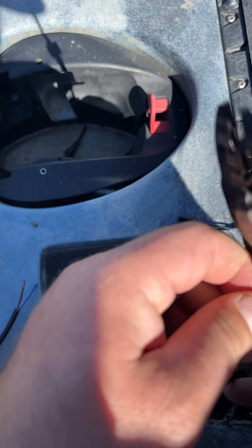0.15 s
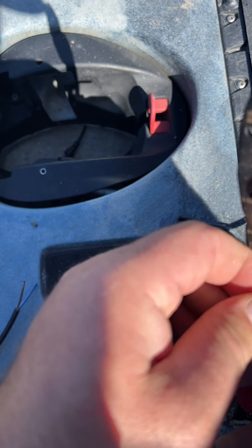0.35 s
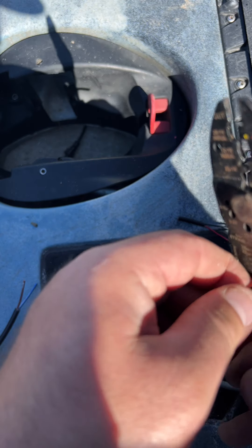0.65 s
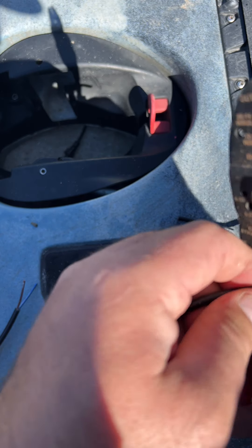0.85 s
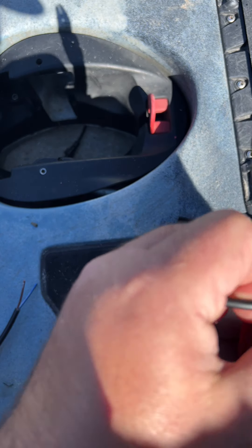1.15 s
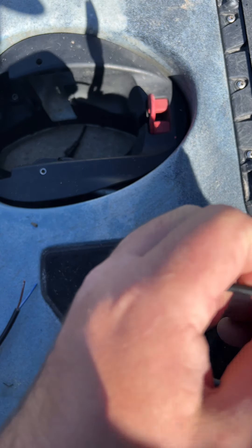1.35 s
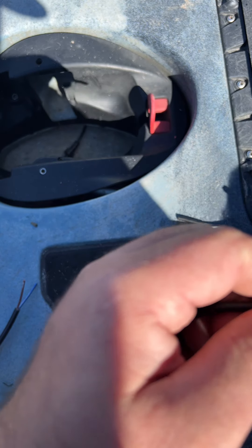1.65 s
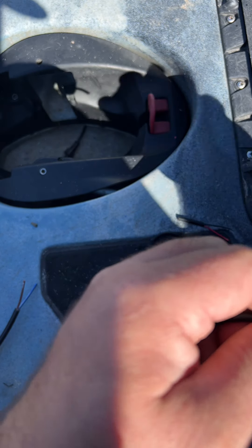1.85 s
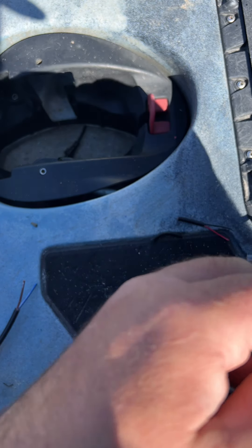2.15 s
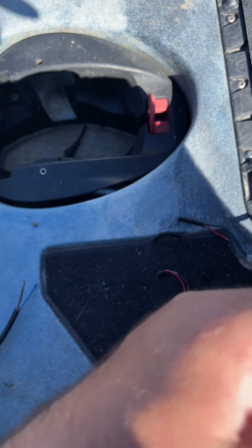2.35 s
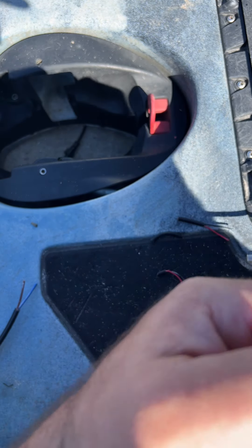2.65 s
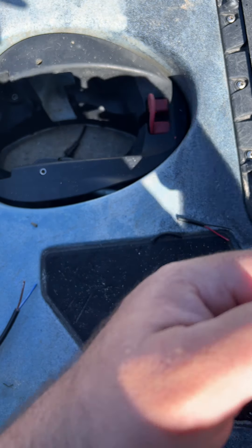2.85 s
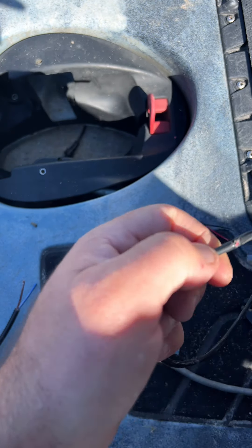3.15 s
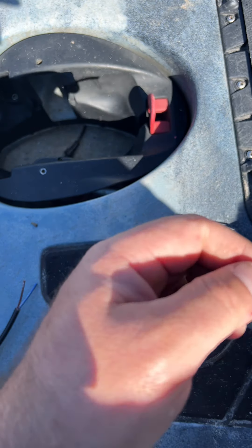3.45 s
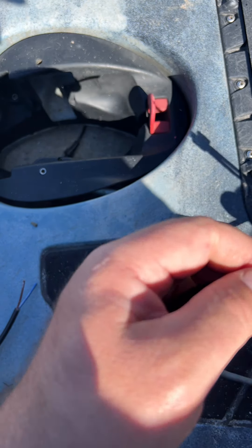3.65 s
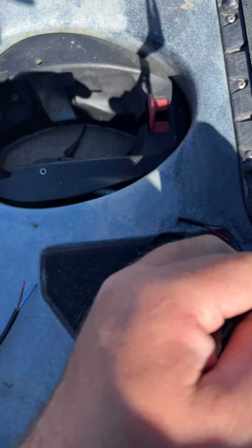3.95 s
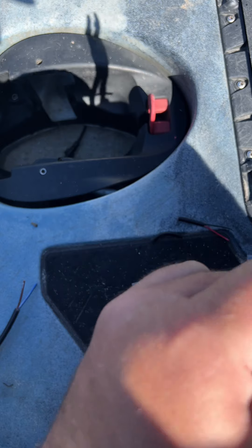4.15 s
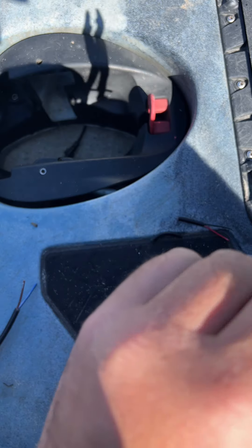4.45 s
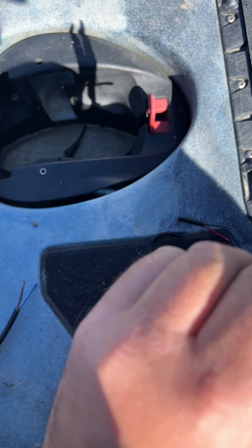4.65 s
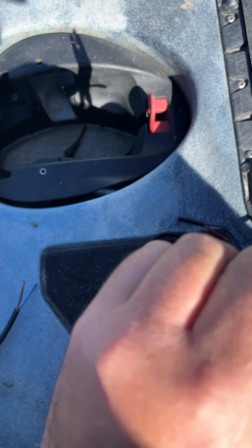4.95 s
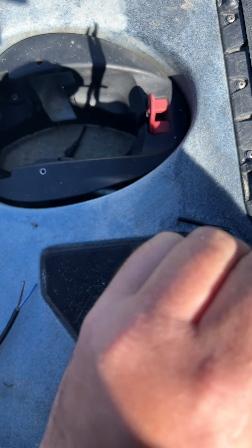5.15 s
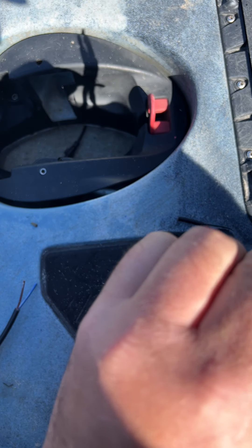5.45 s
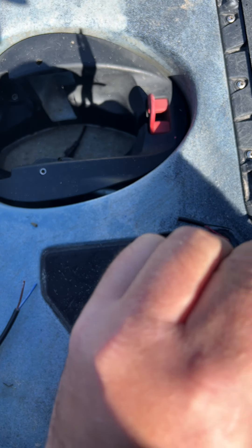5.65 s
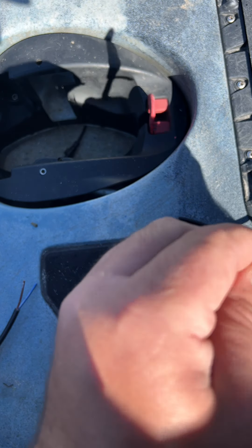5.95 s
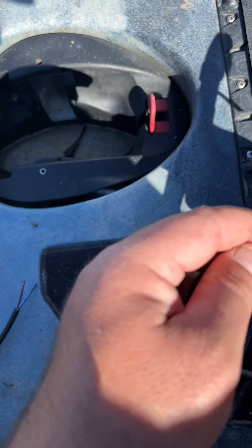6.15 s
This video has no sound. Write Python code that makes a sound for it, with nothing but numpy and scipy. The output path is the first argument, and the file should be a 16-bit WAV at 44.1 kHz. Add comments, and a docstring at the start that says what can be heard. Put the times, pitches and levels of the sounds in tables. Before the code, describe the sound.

Hands fidget with cutters and wire over a booming metal surface while distant traffic rumbles and an approaching vehicle grows, ending around a loud snip.

```python
"""Outdoors, far traffic (banded noise) and a nearing vehicle (boom, overtones, rumble, roar) sound throughout.
Hands work wire cutters close to a phone: wire rubs as uneven noise, and steel ticks as resonant bursts.
Small birds peep as gliding tones near 0.1 s and 1.3 s; loose cable knocks a hollow metal deck at 0.2 s, then
tumbles on it near 1.9 s and 3.5 s, as decaying modes with noisy rattles. The loudest snip comes near 5.75 s,
as the tyre roar still grows."""
import sys
import numpy as np
from scipy import signal
from scipy.fft import rfft, irfft, next_fast_len
from scipy.io import wavfile
from scipy.ndimage import uniform_filter1d

SR = 44100
rng = np.random.default_rng(int(sys.argv[2]) if len(sys.argv) > 2 else 0)


def file_out(sig):
    """Save sig as 16-bit WAV at sys.argv[1]."""
    # one column per channel
    cols = np.atleast_2d(sig).T
    # limit, then scale
    lim = np.clip(cols, -1, 1)
    pcm = np.round(lim * 32767).astype(np.int16)
    wavfile.write(sys.argv[1], SR, pcm)


N = 278334

# In band tables, width_hz is that of one pass (bands() makes two) and level_db is relative within the table.
# Far traffic spectrum before scaling: centre_hz, level_db (relative)
TRAFFIC_SPECTRUM = [(25, -27), (59, -4), (80, 1), (108, -11.5), (166, -1.5), (215, -22.5), (270, -39),
                    (450, -45), (1260, -45), (3000, -54.5), (4000, -45.5), (5200, -57.5), (8300, -62),
                    (10500, -72.5), (16000, -91)]
# Stereo breadth of the traffic: centre_hz, side_over_mid (ratio)
TRAFFIC_BREADTH = [(30, 1.2), (100, .12), (300, .3), (600, .7), (1200, .4), (5000, 0.49), (14000, .9)]
# Vehicle course: start_s, firing_rate_hz, boom_db, growl_db
VEHICLE_COURSE = [(0, 78, -47, -58), (1.1, 77, -48, -56), (1.7, 80, -46, -55), (2.2, 79.3, -48, -48),
                  (2.33, 79.5, -36, -49), (2.6, 79.4, -43, -48), (2.7, 79.5, -38, -50),
                  (2.95, 80, -39, -51), (3.25, 78, -48, -46), (3.85, 80.5, -38, -47),
                  (4.22, 79.6, -36, -44), (4.27, 79.3, -45, -45), (4.38, 79.5, -36, -45),
                  (4.47, 81.4, -52, -43), (4.66, 81.5, -29, -42), (4.95, 83.2, -27, -42),
                  (5.32, 85.3, -18, -39), (5.46, 85.8, -24, -39), (5.6, 86.7, -16, -38),
                  (5.78, 88.3, -20, -38), (5.87, 88.2, -28, -34), (6.06, 88.6, -29, -37),
                  (6.31, 88, -37, -38)]
# Exhaust overtones: multiple_of_firing_rate, level_db (relative to the growl)
EXHAUST_OVERTONES = [(1.5, -9), (2, 0.5), (2.5, -15), (3, -13.5), (4, -24)]
# Body rumble: centre_hz, width_hz, level_db
BODY_RUMBLE = [(60, 26, 2), (111.1, 62, -1), (184, 73, -4)]
# Tyre noise colour: centre_hz, width_hz, level_db
TYRE_BANDS = [(290, 73, 5.5), (420, 370, -1), (665, 870, 19.5), (1050, 1300, 0), (1917.5, 2200, 3),
              (3797, 2500, -24)]
# Tyre roar course: time_s, level_db
TYRE_COURSE = [(0, -81.5), (1.7, -71), (2.2, -65), (2.9, -66.5), (3.9, -67.5), (4.5, -65), (5, -60.5),
               (5.5, -59.5), (5.9, -56), (6.31, -54.5)]
# Whine tones: pitch_hz, level_db (before the swell)
WHINE_TONES = [(9518, -83), (9685, -83)]
# Rise and fall of the whine: time_s, gain_db
WHINE_COURSE = [(4.5, -30), (4.8, -13), (5.2, -4), (5.72, -2), (5.85, -30)]
# Wire sliding through fingers and jaws: start_s, rise_s, hold_s, fade_s, hiss_db, scrape_db, strand_db
WIRE_RUBS = [(1.118, .015, .045, .045, -57, -51, -64), (1.435, .04, .1, .07, -64, -73, -68),
             (2.115, .015, .02, .08, -70, -85, -90), (2.605, .008, .01, .06, -67, -65, -70),
             (2.81, .014, .06, .05, -60, -68, -64), (2.9, .07, .08, .2, -56, -66, -65),
             (3.44, .025, .06, .03, -68, -72, -80), (3.78, .015, .2, .05, -69, -75, -75),
             (3.98, .06, .15, .04, -73, -80, -80), (4.3, .02, .015, .015, -71, -85, -95),
             (4.525, .015, .02, .02, -72, -85, -95), (5.712, .01, .008, .02, -53, -56, -70),
             (5.745, .003, .008, .04, -61, -57, -72), (6.06, .08, .03, .06, -63, -67, -78),
             (6.2, .06, .05, .05, -64, -66, -78)]
# Sheath hiss: centre_hz, width_hz, level_db
HISS_BANDS = [(4100, 1100, 3.5), (6330, 1450, 3), (7400, 3850, 3.5), (9750, 1500, -27), (14300, 2500, -5)]
# Jaw scrape: centre_hz, width_hz, level_db
SCRAPE_BANDS = [(1000, 900, 6), (1860, 1650, 8), (2480, 1150, 2.5), (3800, 1600, -18)]
# Singing strand: centre_hz, width_hz, level_db
STRAND_BANDS = [(4720, 220, 0)]
# Bird peeps: start_s, length_s, first_pitch_hz, last_pitch_hz, level_db
BIRD_PEEPS = [(.09, .15, 6600, 6520, -82), (1.22, .12, 6480, 6330, -79), (1.35, .07, 6220, 6480, -80),
              (1.22, .055, 8250, 7900, -85), (1.3, .055, 8020, 8690, -83)]
# Cable falls: start_s, rattle_db, boom_db, tick_db, boom_centre_hz, rattle_centre_hz
CABLE_FALLS = [(0.206, -37, -43, -49, 205, 1760), (1.776, -27, -13, -34, 172, 1095),
               (1.793, -44, -15, -49, 143, 610), (1.831, -20, -3, -25, 178, 654),
               (1.853, -31, -30, -36, 128, 662), (1.869, -17, -17, -48, 161, 690),
               (1.884, -33, -15, -42, 166, 608), (1.904, -19, -10, -17, 126, 1810),
               (1.912, -13, -12, -41, 264, 980), (1.925, -21, -13, -42, 172, 1070),
               (1.959, -25, -13, -41, 127, 1231), (1.977, -13, -15, -35, 145, 896),
               (1.989, -24, -16, -59, 229, 800), (2.043, -41, -27, -60, 118, 1800),
               (3.12, -62, -40, -66, 200, 700), (3.159, -58, -35, -60, 213, 649),
               (3.21, -56, -38, -62, 300, 650), (3.258, -42, -40, -55, 215, 1080),
               (3.271, -32, -34, -46, 164, 1200), (3.323, -29, -23, -35, 266, 740),
               (3.345, -31, -25, -35, 129, 1056), (3.361, -16, -16, -27, 188, 900),
               (3.381, -27, -18, -32, 156, 937), (3.412, -22, -31, -33, 339, 1660),
               (3.44, -36, -33, -55, 161, 1087), (3.484, -31, -36, -38, 127, 1420),
               (3.492, -33, -38, -60, 207, 1500), (3.567, -22, -31, -55, 126, 1310),
               (3.589, -35, -29, -61, 127, 1020), (3.626, -24, -37, -60, 145, 1352),
               (3.649, -18, -26, -32, 230, 950), (3.664, -14, -15, -34, 256, 1070),
               (3.674, -25, -22, -48, 215, 1447), (3.689, -21, -20, -50, 148, 1030),
               (3.719, -30, -24, -49, 140, 678), (3.756, -24, -28, -50, 300, 1500),
               (3.784, -37, -30, -66, 169, 1000)]
# Deck sheet modes: pitch_hz, level_db (relative), t60_s
DECK_MODES = [(57.73, -8.5, 0.47), (77, 0.5, 0.27), (110.5, 1.5, 0.103), (158.7, 0.5, 0.13),
              (188, -1.5, 0.093), (227.3, 1.5, 0.11), (297, 0.5, 0.13), (347.5, 1.5, 0.12),
              (389.2, 3, 0.079), (478.6, 2.5, 0.089)]
# Rattle on the deck: centre_hz, width_hz, level_db
RATTLE_BANDS = [(647.5, 240, 10), (827, 68, 6.5), (919, 224, 11.5), (1022, 153, 8.5), (1250, 300, -5),
                (1317, 105, 2), (1407, 420, 6.5), (1724, 450, 6), (2044, 540, -8), (2400, 300, -5),
                (2887, 220, -13), (3576, 320, -13.5)]
# Cable end on steel: centre_hz, width_hz, level_db
CABLE_END_BANDS = [(3980, 3200, 7.5), (6160, 1800, 4), (7740, 6000, -7), (10160, 1200, -28),
                   (14500, 2300, -23)]
# Cutter contacts: start_s, handles_db, jaws_db, ring_centre_hz
CUTTER_TICKS = [(0.832, -57, -61, 1818), (1.1281, -44, -52, 1933), (1.1345, -40, -55, 1750),
                (1.2775, -58, -61, 1810), (1.7167, -44, -52, 1770), (2.1745, -50, -49, 1820),
                (2.4914, -52, -56, 3127), (2.6099, -45, -58, 2103), (2.7227, -44, -58, 2514),
                (3.8621, -49, -63, 1978), (3.907, -38, -46, 2912), (4.084, -48, -69, 1903),
                (4.1585, -47, -55, 1552), (4.2071, -40, -60, 3020), (4.2467, -52, -70, 2603),
                (4.7588, -52, -58, 3083), (5.07, -53, -60, 1730), (5.6336, -49, -48, 1500),
                (5.7258, -30, -31, 2420), (5.7458, -17, -21, 1780), (5.9282, -34, -31, 2052),
                (6.0544, -44, -65, 1830)]
# Gripped handles: centre_hz, width_hz, level_db
HANDLE_BANDS = [(800, 900, -7), (1806, 235, 1), (2210, 1400, -2.5), (2805, 652, 0.5), (3620, 2100, -9),
                (4470, 600, -9)]
# Bright jaws: centre_hz, width_hz, level_db
JAW_BANDS = [(6475, 1300, -10), (8030, 850, -5), (9353, 990, -9), (10530, 730, -6), (15400, 3400, -13)]

SIDES = np.array([[1], [-1]])  # left, right
TRAFFIC_DB, FAR_LEFT_DB = -44.5, -1.9  # traffic rms; left over right of all far sounds
# the weaker the note arrives, the more it comes and goes
FADING_DB, STEADY_ABOVE_DB, FADING_PER_DB = .44, -32, .25
RUB_FADE_DB = 18  # gained over the rise, lost over the fade
RESTLESS_DB, RESTLESS_SWING_DB = -89, 5.5  # the fingers never hold quite still
RATTLE_T60_S, SOFTER_S_PER_DB = .06, .002  # t60 of a -13 dB fall; softer falls slither on for longer
DECK_LEFT_DB, DECK_SCATTER_DB = -1.5, 1.5
TICK_T60_S, TICK_SCATTER_DB = .022, 1.5
FIDGET_COUNT, FIDGET_DB = 30, -66  # faint stray ticks of the pivot and the base of their random levels
JAWS_HZ, DULLER_PER_DB = 8000, .3  # a light tick rings mainly here (dB per octave, per dB of softness)
PORT_HZ, PORT_WIDTH_HZ, PORT_DB = 8300, 600, 6  # microphone inlet; level of the added band
BASS_CUT_HZ, TOP_HZ = 45., 16000


def undb(db):
    """Decibels are logarithmic: 20 dB is a tenfold amplitude."""
    return np.exp(np.asarray(db) * (np.log(10) / 20))


def unit(x):
    """Root-mean-square normalisation to 1."""
    return x / np.sqrt(np.mean(x ** 2))


def noise():
    """White noise: equal power at all frequencies."""
    return rng.standard_normal(N)


def band(x, hz, width):
    """Simple resonance: a two-pole band-pass with gain 1 at the centre."""
    return signal.lfilter(*signal.iirpeak(hz, hz / width, SR), x)


def bands(x, table):
    """Parallel resonances: a sum of two-pole band-passes, each taken twice for steepness."""
    size = next_fast_len(x.shape[-1] + 2048)  # room for ringing
    z = np.exp(-2j * np.pi * np.arange(size // 2 + 1) / size)  # delay of one sample
    gain = 0
    for hz, width, db in table:
        b, a = signal.iirpeak(hz, hz / width, SR)
        one_pass = b[0] * (1 - z * z) / (1 + (a[1] + a[2] * z) * z)
        gain = gain + undb(db) * one_pass ** 2
    return irfft(rfft(x, size) * gain, size)[..., :x.shape[-1]]


def on_log(hz, table):
    """Interpolation on a logarithmic frequency axis."""
    centres, values = np.array(table).T
    return np.interp(np.log(hz), np.log(centres), values)


def over_time(t, table):
    """Linear interpolation of a (time, value) course."""
    return np.interp(t, *np.transpose(table))


def walk(rate):
    """Slow random modulation: levels held 1 / rate s and slewed twice, spread near 1."""
    k = int(SR / rate)
    steps = np.repeat(rng.standard_normal(N // k + 1), k)
    return 1.303 * uniform_filter1d(uniform_filter1d(steps, k), k)[:N]


def add(out, s, left, right, db, pan_db):
    """Superposition: place an event by its peak level, then pan left over right."""
    i = int(s * SR)
    pair = np.array([left, right])[:, :N - i]
    out[:, i:i + pair.shape[1]] += pair * undb(db + pan_db * SIDES / 2) / np.abs(pair).max()


def near(hz, centre, db_per_octave):
    """Modal excitation: a blow favours the modes around one pitch; the rest is chance."""
    return -db_per_octave * np.abs(np.log2(hz / centre)) + 2.67 * rng.standard_normal()


def favoured(table, centre, db_per_octave):
    """Modal excitation of a whole band table."""
    return [(hz, width, db + near(hz, centre, db_per_octave)) for hz, width, db in table]


def burst(t, t60, table, spread, grit_db, tail_db):
    """Impact excitation of resonances: a sharp contact, then a dying uneven scatter, partly unlike at the ports."""
    uneven = np.repeat(rng.standard_normal(len(t) // 40 + 1), 40)[:len(t)]
    tail = undb(tail_db) * undb(grit_db * uneven) * 1000. ** (-t / max(t60, .003))
    mid, side = rng.standard_normal((2, len(t))) * (np.exp(-t / 0.00056) + tail)
    return bands(np.array([mid + spread * side, mid - spread * side]), table)


def traffic():
    """Incoherent superposition: third-octave noise bands swell together and flicker alone."""
    out, swell = 0, walk(0.99)
    hiss = rng.standard_normal((3, 2, N))  # adjacent bands draw on separate noises
    for k, hz in enumerate(28 * 2 ** (np.arange(28) / 3)):
        three_passes = np.tile(np.concatenate(signal.iirpeak(hz, 3, SR)), (3, 1))
        mid, side = signal.sosfilt(three_passes, hiss[k % 3])
        gain = undb(on_log(hz, TRAFFIC_SPECTRUM) + 1.8 * swell + 0.45 * walk(3.9))
        out = out + gain * (mid + on_log(hz, TRAFFIC_BREADTH) * side * SIDES)
    return unit(out) * undb(TRAFFIC_DB)


def vehicle():
    """Harmonic and broadband radiation: a wavering exhaust note and overtones, rumble, tyre roar, thin whine."""
    t = np.arange(N) / SR
    times, *courses = np.array(VEHICLE_COURSE).T
    hz, boom_db, growl_db = (np.interp(t, times, course) for course in courses)
    fading_db = FADING_DB + FADING_PER_DB * np.maximum(STEADY_ABOVE_DB - boom_db, 0)
    phase = 2 * np.pi * np.cumsum(hz * (1 + 0.00588 * walk(12))) / SR
    note = np.sqrt(2) * undb(boom_db + fading_db * walk(12)) * np.sin(phase)
    rumble = undb(growl_db - 3.0) * unit(bands(noise(), BODY_RUMBLE))
    drone = note + rumble
    for k, db in EXHAUST_OVERTONES:  # paths past houses add and cancel, each overtone on its own
        drone = drone + undb(growl_db + db + 4.3 * walk(12)) * np.sin(k * phase + 1.33 * walk(14))
    mid, side = (unit(bands(noise(), TYRE_BANDS)) * undb(walk(8)) for _ in range(2))
    roar = undb(over_time(t, TYRE_COURSE)) * (mid + .5 * side * SIDES)
    whine = sum(undb(db) * np.sin(2 * np.pi * pitch * t) for pitch, db in WHINE_TONES)
    return drone + whine * undb(over_time(t, WHINE_COURSE)) + roar


def rubbing():
    """Uneven friction: fine hiss from the sheath, coarser scrape from the jaws, a strand that sings along."""
    t, gains = np.arange(N) / SR, np.zeros((3, N))
    for s, rise, hold, fade, *dbs in WIRE_RUBS:
        ends = s + np.cumsum([0, rise, hold, fade])
        shape = undb(np.interp(t, ends, [-RUB_FADE_DB, 0, 0, -RUB_FADE_DB]))
        gains += undb(dbs)[:, None] * shape * ((t > ends[0]) & (t < ends[-1]))
    gains[0] += undb(RESTLESS_DB + RESTLESS_SWING_DB * walk(14))
    grain = undb(1.2 * walk(300) + .7 * walk(45))
    gains = gains * undb(1.5 * walk(25) + 1.2 * walk(120))  # the pull is never even
    out = 0
    for table, gain in zip((HISS_BANDS, SCRAPE_BANDS, STRAND_BANDS), gains):
        mid, side = (unit(bands(grain * noise(), table)) for _ in range(2))
        out = out + gain * (mid + 0.68 * side * SIDES)
    return out


def bird():
    """Frequency and amplitude modulation: thin gliding peeps flutter a little."""
    out, flutter = np.zeros(N), undb(2. * walk(122))
    for s, length, first_hz, last_hz, db in BIRD_PEEPS:
        i, u = int(s * SR), np.linspace(0, 1, int(length * SR))
        tone = np.sin(2 * np.pi * np.cumsum(first_hz + (last_hz - first_hz) * u) / SR)
        out[i:i + len(u)] += np.sqrt(2) * undb(db) * np.sin(np.pi * u) ** .6 * tone
    return out * flutter


def boom(t, centre):
    """Plate vibration: the sheet swells over a few ms as bending waves spread, its modes out of step."""
    left = rng.uniform(0, 2 * np.pi, len(DECK_MODES))
    turn = rng.uniform(-np.pi, np.pi, len(DECK_MODES))
    right = left + turn * np.array(DECK_MODES)[:, 0] / 1500  # short waves differ more between the ports
    swell = 1 - np.exp(-(t / 0.0052) ** 2)
    pair = np.zeros((2, len(t)))
    for (hz, db, t60), *phases in zip(DECK_MODES, left, right):
        fall = undb(db + near(hz, centre, 9.4)) * 1000. ** (-t / t60)
        pair += fall * np.sin(2 * np.pi * hz * t + np.array(phases)[:, None])
    return swell * pair


def cable():
    """Impact on a plate: each fall booms the sheet, rattles on it and starts with a bright tick."""
    out, t = np.zeros((2, N)), np.arange(7000) / SR
    for s, db, boom_db, tick_db, boom_hz, rattle_hz in CABLE_FALLS:
        t60 = RATTLE_T60_S + SOFTER_S_PER_DB * (-13 - db)
        pan_db = DECK_LEFT_DB + DECK_SCATTER_DB * rng.standard_normal()
        add(out, s, *boom(t, boom_hz), boom_db, -3.)
        rattle = burst(t[:4000], t60, favoured(RATTLE_BANDS, rattle_hz, 4.2), 0.42, 4.6, -9.5)
        add(out, s, *rattle, db, pan_db)
        tick = burst(t[:3000], 0.81 * t60, CABLE_END_BANDS, 0.79, 4.1, -4.0)
        add(out, s, *tick, tick_db, pan_db)
    return out


def stray_ticks():
    """Random impacts: pivot ticks at chance times, levels and ring centres."""
    return [(a * (N - 99) / SR, FIDGET_DB - 5.5 + 8 * b, FIDGET_DB + 8 * c, 1500 + 1600 * d)
            for a, b, c, d in rng.random((FIDGET_COUNT, 4))]


def cutters():
    """Damped resonance: a brief gritty snap, rung dry by the gripped handles and brightly by the jaws."""
    out, t = np.zeros((2, N)), np.arange(2500) / SR
    for s, db, bright_db, ring_hz in CUTTER_TICKS + stray_ticks():
        pan_db = TICK_SCATTER_DB * rng.standard_normal()
        handles = favoured(HANDLE_BANDS, ring_hz, 5.2)
        add(out, s, *burst(t, TICK_T60_S, handles, 0.46, 4.7, -11.5), db, pan_db)
        jaws = favoured(JAW_BANDS, JAWS_HZ, DULLER_PER_DB * (-20 - bright_db))
        add(out, s, *burst(t, TICK_T60_S, jaws, 1.0, 3., -9.0), bright_db, pan_db)
    return out


def scene():
    """Linear superposition: far sounds share a tilt to the right, close sounds add to them."""
    far = (traffic() + vehicle() + bird()) * undb(FAR_LEFT_DB * SIDES / 2)
    return far + rubbing() + cable() + cutters()


def record(dry):
    """Inlet resonance and band limiting: a narrow treble band lifts; the phone drops deep bass and cuts the top."""
    heard = dry + undb(PORT_DB) * band(dry, PORT_HZ, PORT_WIDTH_HZ)
    heard[0] = np.roll(heard[0], 1)  # the left port lies a finger's width further off
    heard = signal.sosfilt(signal.butter(2, BASS_CUT_HZ, "high", fs=SR, output="sos"), heard)
    return signal.sosfilt(signal.ellip(10, .2, 70, TOP_HZ, fs=SR, output="sos"), heard)


dry = scene()
out = record(dry)
file_out(out)
```